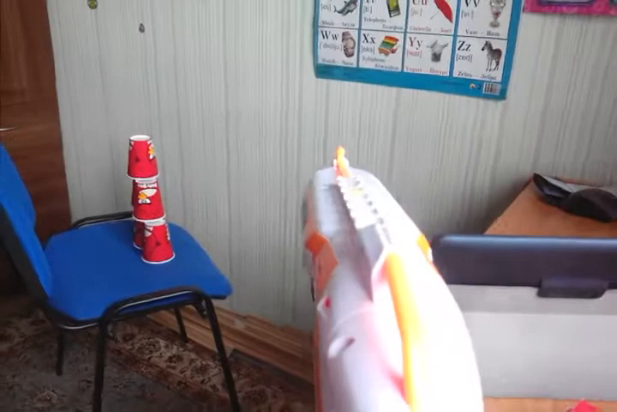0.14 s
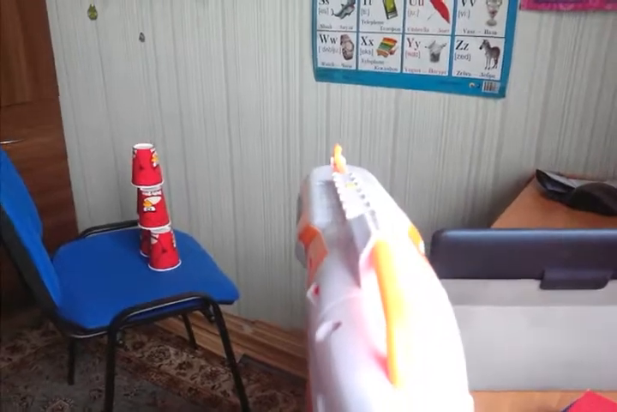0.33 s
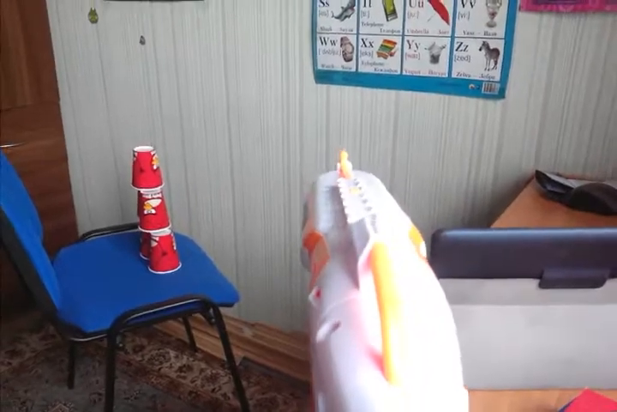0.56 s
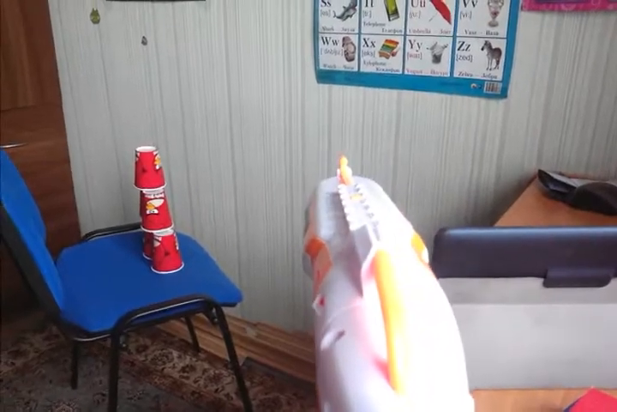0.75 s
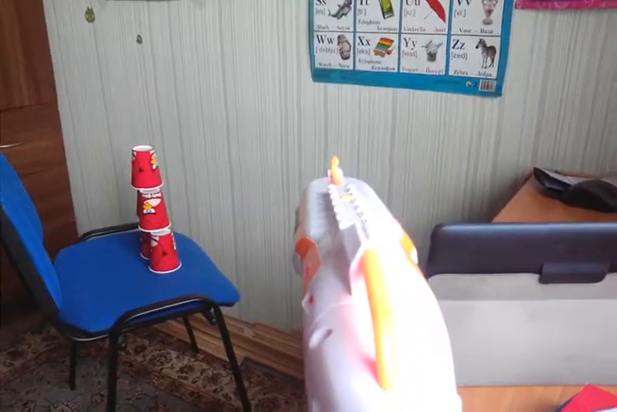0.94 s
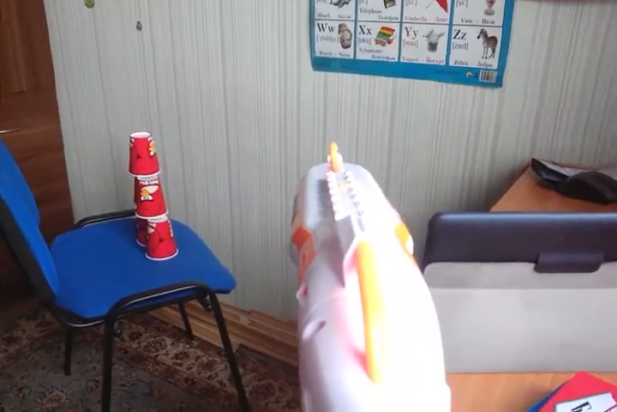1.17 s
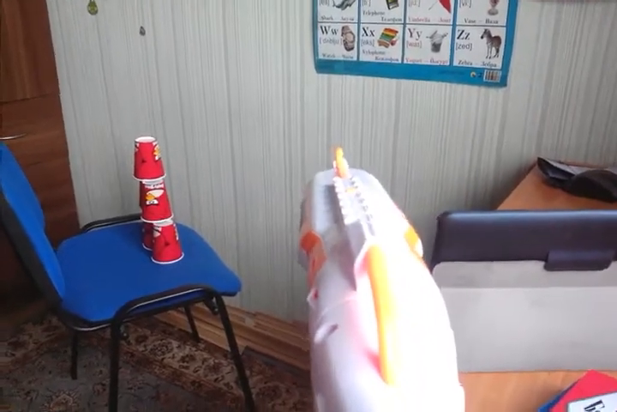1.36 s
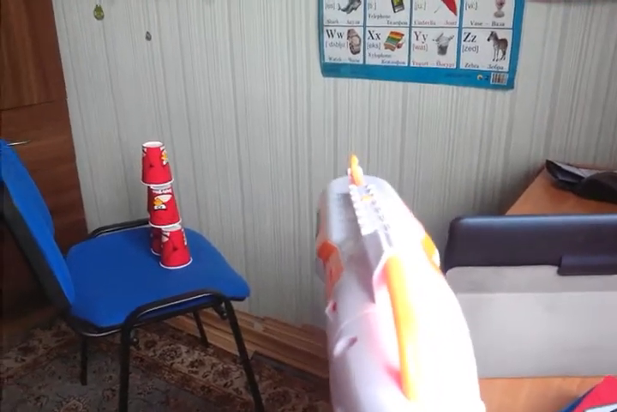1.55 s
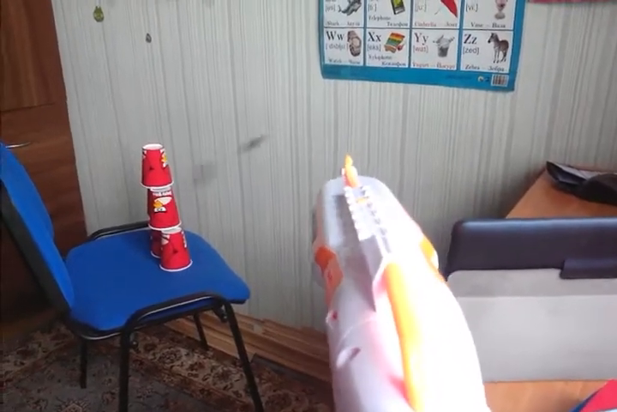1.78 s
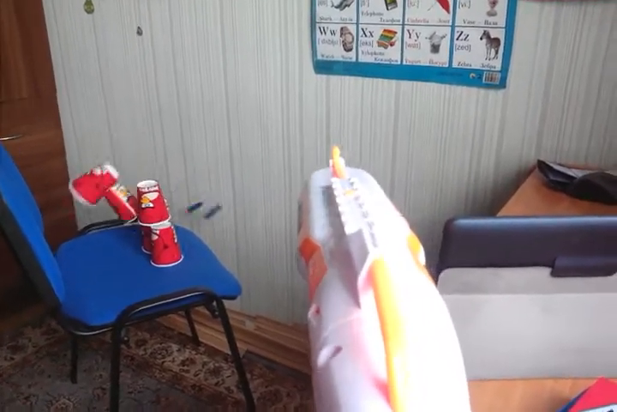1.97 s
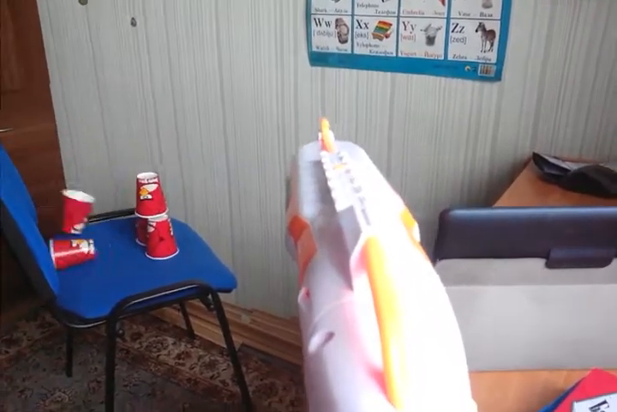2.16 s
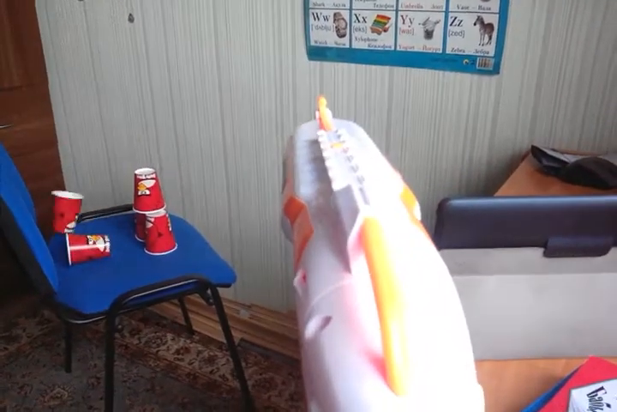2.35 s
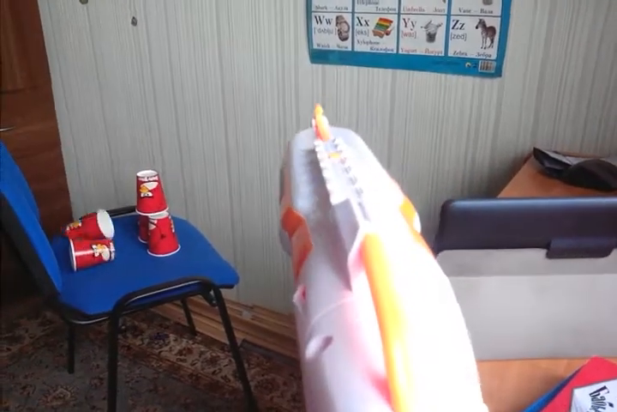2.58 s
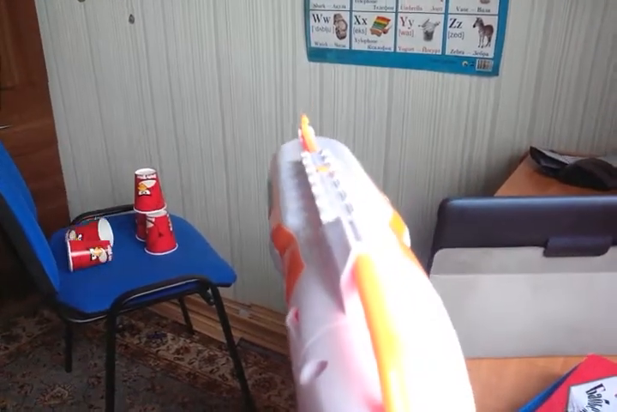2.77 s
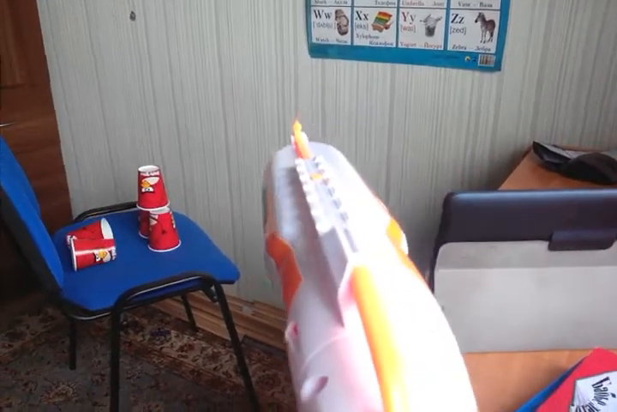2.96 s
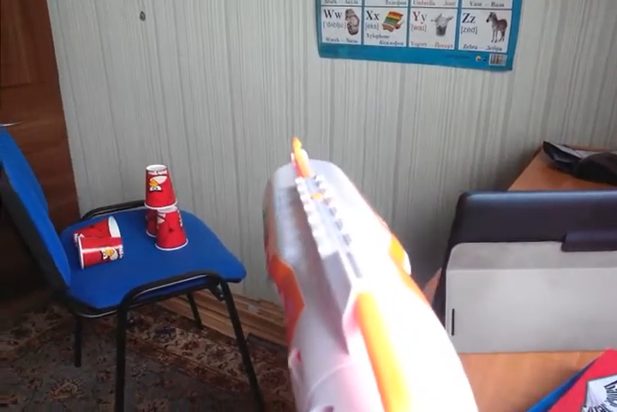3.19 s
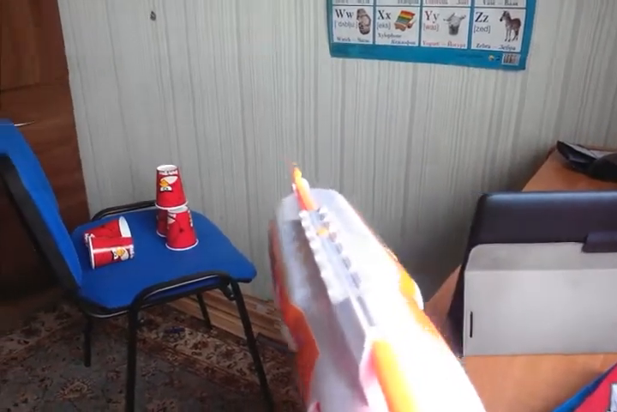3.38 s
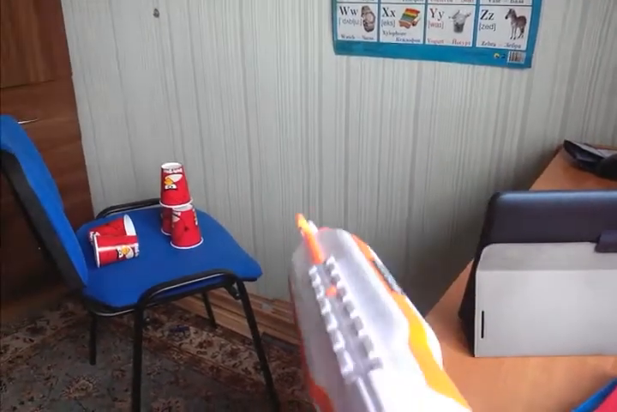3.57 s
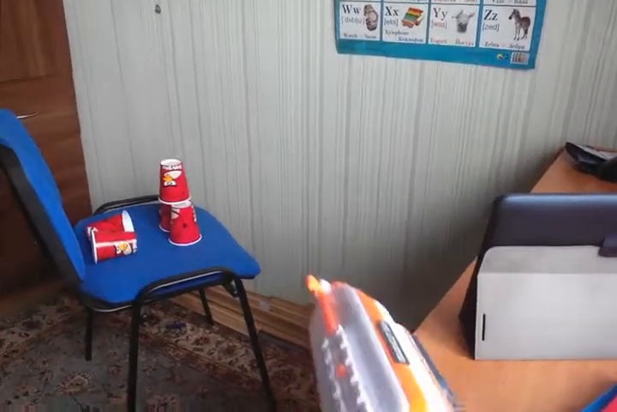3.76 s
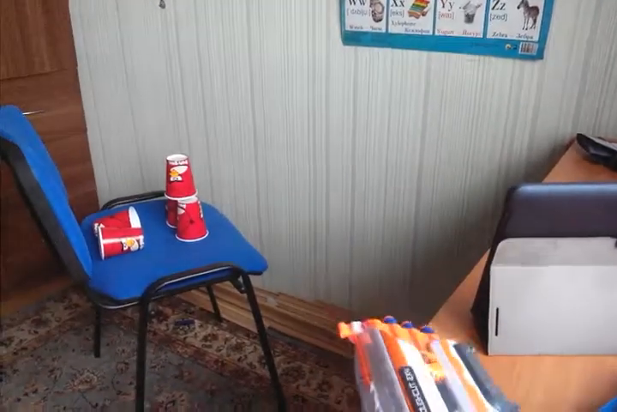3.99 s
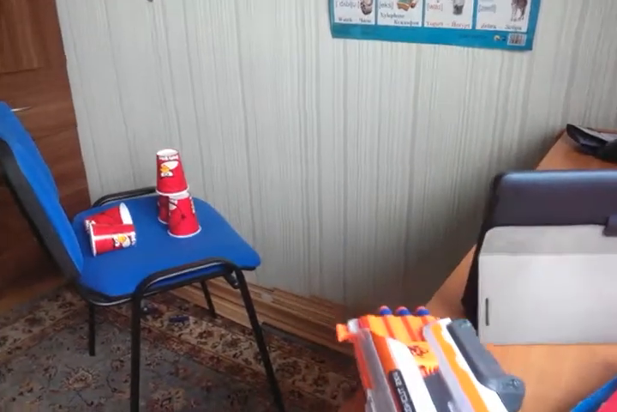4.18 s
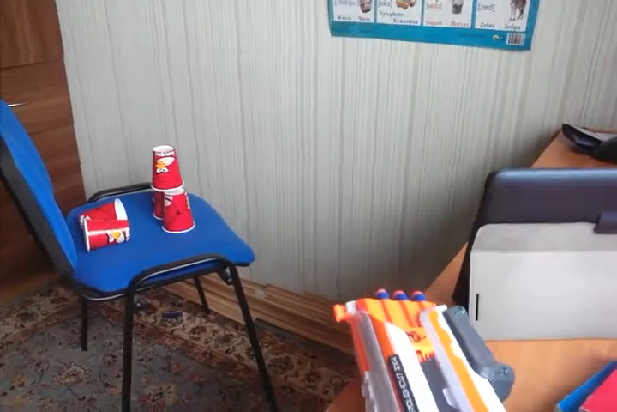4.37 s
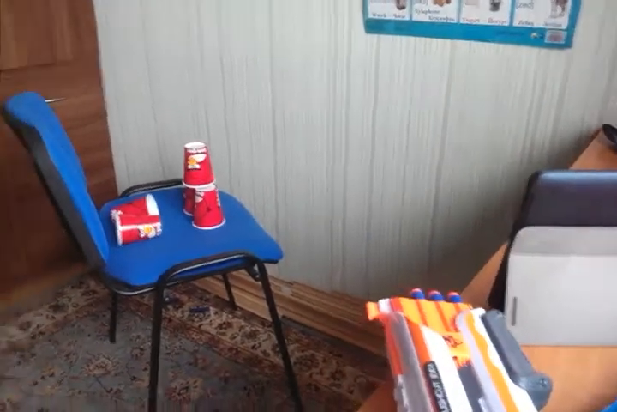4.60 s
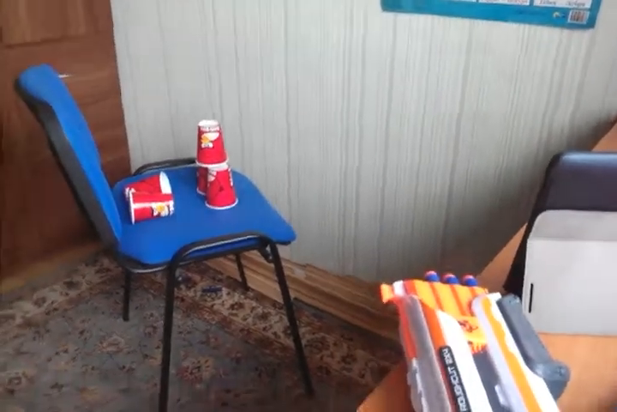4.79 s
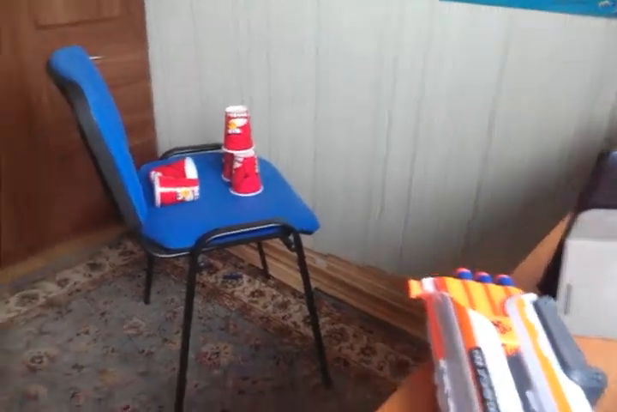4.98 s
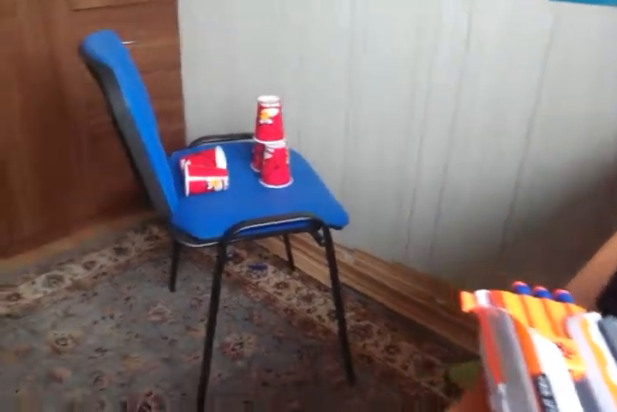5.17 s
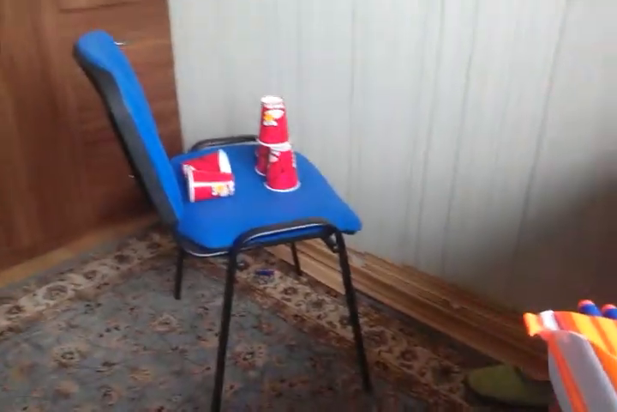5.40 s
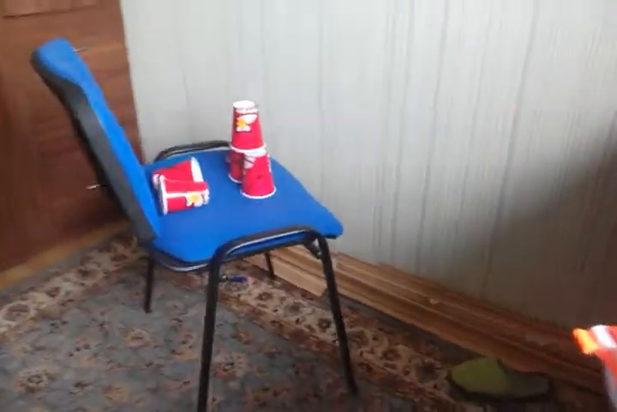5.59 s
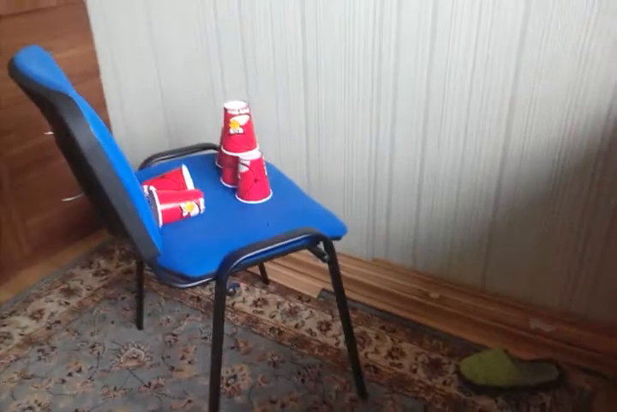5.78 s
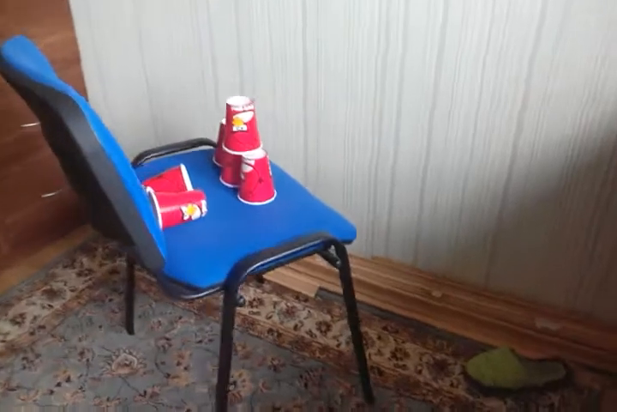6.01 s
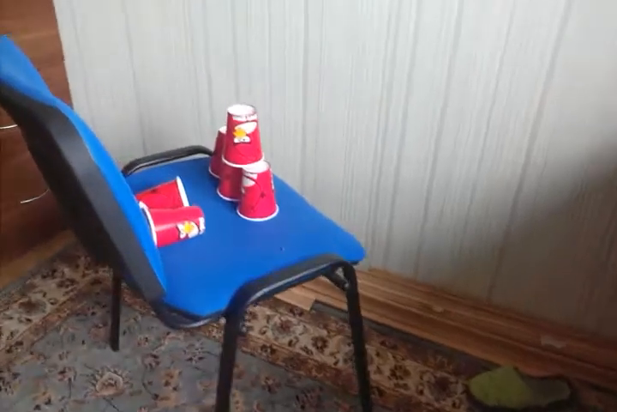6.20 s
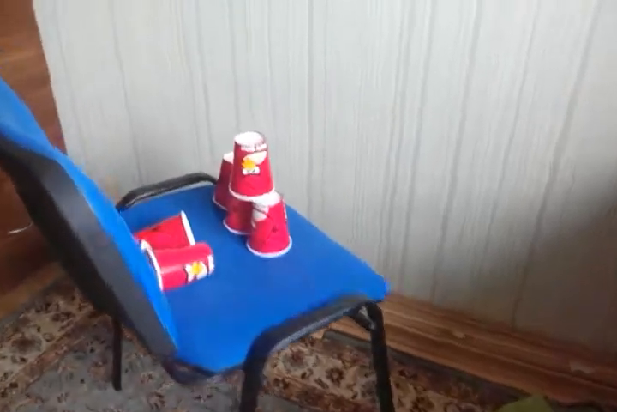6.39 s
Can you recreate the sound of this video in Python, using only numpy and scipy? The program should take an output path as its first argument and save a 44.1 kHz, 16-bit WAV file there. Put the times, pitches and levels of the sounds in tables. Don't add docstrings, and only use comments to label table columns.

```python
import sys
import numpy as np
from scipy import signal
from scipy.fft import rfft, irfft, next_fast_len
from scipy.io import wavfile
from scipy.ndimage import uniform_filter1d, map_coordinates

SR = 44100
rng = np.random.default_rng(int(sys.argv[2]) if len(sys.argv) > 2 else 0)


def makeup_ratio(level_db):
    decades = np.asarray(level_db, float) / 20
    return 10 ** decades


def pcm_store(signal):
    levels = np.round(np.clip(np.atleast_2d(signal), -1, 1) * 32767)
    wavfile.write(sys.argv[1], SR, levels.astype(np.int16).T)


N = 284291

# (time [s], peak [dB], hardness [dB/octave], local note [Hz])
SHOT_HITS = [
    (1.763, -39.5, -4.5, 2393),
    (1.8, -9.5, -3, 3630),
    (1.806, -15.5, -2, 2511),
    (1.811, -1.5, -0.8, 2230),
    (1.818, -5, 1.5, 2100),
    (1.8235, -9.5, 0.5, 2500),
    (1.829, -4, 0.3, 3000),
    (1.837, -12, -0.1, 1972),
    (1.843, -15.5, -2, 1299),
]
WALL_HITS = [
    (1.875, -20, 0.5, 1203),
    (1.885, -19, 2, 3903),
    (2.178, -38, 3, 1900),
    (2.195, -40, -2, 3920),
    (2.226, -44, 5, 3300),
]
STRIKE_HITS = [
    (1.9475, -11.5, 2.5, 3180),
    (1.9644, -25, 16, 3190),
    (2.2852, -37, 0, 3510),
]
CUP_HITS = [
    (1.95, -29, 8, 800),
    (1.971, -33, 6, 900),
    (2.398, -44.5, 1, 1215),
    (2.405, -43, 1.5, 795),
    (2.529, -54, -5, 772),
]
ROLL_HITS = [
    (2.362, -47.5, 1.5, 3270),
    (2.717, -51, -0.5, 2500),
    (2.801, -37.5, 2.5, 846),
    (3.039, -56, 1.5, 802),
    (3.399, -56, -2, 992),
]
GLANCE_HITS = [
    (2.095, -34.5, 2, 1100),
    (2.107, -36.5, 5, 910),
]
TIP_HITS = [
    (2.162, -21, 3.5, 2490),
    (2.18, -36.5, -4, 4800),
]
SEAT_HITS = [
    (2.228, -33.5, -1, 645),
    (2.237, -36.5, 5, 330),
    (2.249, -33.5, -5, 412),
    (2.269, -51.5, 10, 272),
    (2.31, -43.5, 5, 699),
    (2.49, -51.5, -8, 200),
]
SHELL_HITS = [
    (3.667, -46, -0.5, 1100),
    (3.994, -15, 1.5, 1477),
    (3.999, -14.5, -1.5, 902),
    (4.015, -36.5, -25, 910),
    (4.038, -25.5, 0, 875),
    (4.135, -36.5, -8.5, 1350),
    (4.156, -30, -6, 300),
    (4.355, -44, -3, 1110),
]
DESK_HITS = [
    (4.208, -13.5, -1.5, 362),
    (4.217, -16.5, -4.5, 206),
    (4.228, -21.5, 0.5, 365),
    (4.24, -26, -13, 500),
    (4.285, -41, -1, 328),
    (4.823, -45, -7, 223),
]
GRIP_HITS = [
    (4.735, -34.5, 1, 5200),
    (4.747, -17, -3.5, 1540),
    (4.759, -26, -3, 1430),
    (4.774, -29, -8.5, 1650),
    (4.794, -31.5, -6, 1440),
    (4.819, -51, -9, 1423),
    (5.929, -45, -1.5, 910),
    (5.945, -45, -3, 586),
    (5.964, -59, -2, 968),
]
ROCK_HITS = [
    (4.5385, -36, -1, 2800),
    (4.545, -33.5, -2.5, 397),
    (4.593, -36.5, -6, 1490),
    (4.609, -49, 0, 2050),
]
CREAK_HITS = [
    (4.404, -46, -7.5, 2300),
    (4.413, -54, 13, 7000),
    (4.429, -45.5, 1, 2470),
    (4.458, -47.5, 4, 2330),
    (4.506, -54, 1, 2250),
]
# (first peak [dB], loss per contact [dB], hardness [dB/octave], note [Hz])
WALL_RATTLE = (-14.5, 2.2, 0, 1200.5)
RIM_ROCKING = (-50, 1.5, 2, 590)
# (first time [s], spacing [s])
WALL_BEAT = (1.858, .0128)
RIM_BEAT = (2.829, .04)

# (frequency [Hz], width [Hz], level [dB])
BLASTER_BODY = ([(47, -53.5), (100, -22), (200, 0.5), (293, -13.5), (405, -6), (441, -7), (1300, -3),
                 (1840, -3.5), (1960, -1.5), (5180, -15.5), (7320, -11), (14000, -23)], [(2100, 270, -8),
                 (3140, 410, 1), (3630, 110, -5.5), (7300, 170, -4.5), (7858, 35, -5.5), (8200, 41, -8),
                 (8900, 25, -12.5), (8750, 42, -12.5), (10200, 290, -15), (12000, 32, -23.5)])
WALL_BODY = ([(59, -47), (100, -5), (877, -5.5), (952, -6), (1200, -6), (2570, -10), (3970, -10.5),
              (10700, -23), (14000, -32)], [(1122.5, 120, -1), (4084, 63, -1), (6155, 30, -22)])
PAPER_BODY = ([(88, -52.5), (150, -48), (443, -1), (588, -14), (753, -3), (844, -14), (1120, -15),
               (1940, -33), (3190, -18.5), (12000, -35), (14000, -43.5)], [(763, 110, -13.5),
               (924, 60, -15), (1080, 35, -14.5)])
RIM_BODY = ([(120, -64), (200, -12.5), (667, -18.5), (809, -11), (1050, -22.5), (3330, -26.5),
             (13000, -43)], [(780, 60, -9.5), (2690, 36, -28), (3270, 90, -12)])
FOAM_BODY = ([(88, -57), (150, -20), (427, -4.5), (604, -13), (888, -11), (1010, -11.5), (12000, -46),
              (15600, -65), (22000, -120)], [(910, 44, -10), (4000, 62, -14)])
TIP_BODY = ([(120, -47), (200, -10), (815, 3), (1180, 8), (1720, -27), (2450, -7), (2780, -21.5),
             (14000, -33)], [(1180, 10, -12), (2490, 40, -2), (3000, 34, -7), (3630, 32, -4.5),
             (4000, 18, -4), (6930, 39, -9.5), (8360, 120, -9.5)])
PAD_BODY = ([(18, -48), (30, -5), (329, -9), (639, -14), (853, -16), (1590, -31), (3150, -29), (6000, -47),
             (7800, -58), (13200, -120)], [(155.4, 9.6, 5), (300, 76, -6.5), (755, 60, -11)])
SHELL_BODY = ([(35, -43), (60, -18.5), (175, -11.5), (310, -15.5), (501, -15.5), (689, -14), (927, 4.5),
               (1060, -4), (4080, -16.5), (14000, -36)], [(491, 30, 10.5), (916, 82.1, -24),
               (1740, 21.4, -6), (2030, 32, -8), (2230, 110, 10.5), (2903, 86, 4.5), (3510, 60, 3),
               (5070, 31, -30)])
DESK_BODY = ([(18, -74.5), (30, -56), (93, -18.5), (363, -5), (435, -12.5), (1020, -19.5), (1190, -15.5),
              (1980, -31.5), (7360, -30), (14000, -39.5)], [(222, 32, 0), (354, 40, -9), (860, 22, -17),
              (1090, 55, -6.5), (2136, 120, -9.5), (3170, 61, -14)])
GRIP_BODY = ([(47, -53.5), (80, -49), (174, -1), (286, -11.5), (405, -4.5), (665, -11.5), (710, -7),
              (1420, -4.5), (14000, -36.5)], [(1050, 110, 3), (1440, 100, -2), (1697, 33, -11),
              (2145, 90, 2), (2692, 270, 7.5), (3510, 48, -24.5)])
STOCK_BODY = ([(47, -55), (80, -17), (209, -6.5), (293, -11.5), (355, -4), (556, -11.5), (1420, -8.5),
               (13000, -26.5)], [(383, 42, -16), (3000, 530, -5)])
CATCH_BODY = ([(300, -30), (1500, 1), (2400, -8), (4000, -11), (13000, -29)], [(2350, 210, 0.0039)])

# (time [s], peak [dB], pitch [Hz], t60 [s])
BARE_SNAPS = [(1.8015, -10, 3600, 0.0074), (1.8111, -7, 2220, 0.0048), (1.8193, -11, 2900, .003),
              (1.84, -17, 2300, .006), (1.813, -7, 2570, 0.0029), (1.83, -4, 2600, 0.0029),
              (1.8586, -21, 4200, .005), (1.866, -13, 4420, .004), (1.8704, -19, 3500, .004),
              (1.881, -12, 4000, 0.0043), (1.8859, -12, 4000, 0.0043), (1.9497, -19, 3140, 0.0045),
              (1.9661, -19, 3180, 0.0061), (2.0947, -36, 2100, 0.022), (2.8015, -43, 3000, 0.0026),
              (2.804, -50, 5400, .008), (3.9923, -50, 1490, .006), (4.157, -41, 5540, 0.0025),
              (4.181, -55, 4500, .003), (4.7364, -35.5, 5330, 0.0052), (4.7476, -20, 1650, 0.004),
              (4.751, -25.5, 2620, .008), (4.796, -36, 2500, .004), (4.786, -49, 6500, .004),
              (2.2854, -40, 3000, .005), (4.039, -32, 2500, .005), (4.0395, -29, 950, .012),
              (4.404, -57, 2320, .008), (4.534, -52, 2200, .008), (4.5445, -40, 3200, .008),
              (4.553, -44, 1600, .01), (4.595, -45, 2200, .005), (5.1716, -57.5, 4240, .005),
              (5.2078, -56.5, 2500, .006), (5.2909, -54, 5040, 0.0032), (5.7176, -54, 4120, .005)]
# (top time [s], peak [dB], half length [s], pitch [Hz])
SOFT_NOTES = [(1.951, -31, 0.0071, 795), (1.963, -28, 0.0031, 860), (1.978, -23, 0.0098, 745),
              (2.0, -32.5, 0.0046, 755), (2.021, -34, 0.0085, 735), (2.036, -42, .003, 700),
              (2.052, -52, 0.0065, 745), (2.108, -44, 0.0074, 888), (2.173, -43.5, 0.0098, 1185),
              (2.19, -49, 0.0087, 1090), (2.367, -54.5, 0.0054, 3270), (2.813, -45, 0.0063, 795),
              (2.835, -54, .005, 850), (2.853, -60, 0.0065, 780), (2.881, -54, 0.014, 782),
              (2.91, -59.5, .008, 805), (2.932, -59, .005, 790), (2.953, -63, 0.0074, 808),
              (3.045, -64, 0.012, 806), (2.838, -62, 0.0092, 3240), (2.9, -73, .03, 3190),
              (4.018, -46, 0.0093, 894), (4.14, -41, 0.0087, 765), (4.153, -38.5, 0.0043, 840),
              (3.672, -51.5, 0.0028, 1050), (3.677, -61.5, 0.0086, 2920), (4.506, -56, 0.0033, 2250),
              (4.115, -49, .007, 736), (4.286, -39, 0.0044, 350), (4.739, -47, .003, 1050),
              (4.738, -48, .003, 2700), (4.79, -42, .005, 1680), (4.814, -44, .005, 1480)]
# (time
# [s], level [dB], half length [s], note [Hz])
GRAINY_SWELLS = [(4.556, -55, 0.026, 630), (4.55, -55, .02, 2030), (4.605, -57, .02, 1370),
                 (4.24, -45.5, 0.035, 840), (4.145, -50, 0.033, 1840), (4.64, -71, 0.26, 2100),
                 (4.899, -68.5, 0.091, 2000), (4.108, -57, .025, 1360), (4.15, -47, .012, 1270),
                 (4.165, -52.5, 0.029, 3040), (3.8, -48.5, 0.027, 265), (4.235, -45.5, 0.028, 1950),
                 (4.23, -51.5, 0.034, 3800), (4.275, -53, .02, 1030), (4.32, -58, .025, 1200),
                 (4.76, -41.5, 0.024, 1370), (4.81, -51, 0.017, 1470), (4.4, -64, 0.026, 1400),
                 (4.8, -59, .02, 3000), (4.83, -54, 0.065, 170), (4.142, -48, 0.013, 1370),
                 (3.8, -63, .05, 2560), (4.375, -62, .015, 1900),
                 (1.85, -48, .1, 140), (1.845, -38, .04, 11000), (1.897, -34, 0.035, 1190),
              (2.103, -52, 0.022, 1500), (2.2, -55, .03, 3700), (2.245, -51, .02, 153),
              (2.25, -51, 0.032, 620), (1.96, -37, .025, 3200), (1.82, -26.5, .03, 1400),
              (3.675, -65, .015, 1500), (3.2, -66, .015, 3200), (1.936, -41, 0.014, 1200),
              (1.963, -38, 0.019, 1020), (2.9, -66, 0.029, 5000), (2.812, -62.5, 0.023, 3300),
              (2.87, -68, .02, 4300), (2.87, -66, 0.019, 1100)]
# (time [s], level [dB], half length [s], swish over cloth [dB])
CLOTH_RUBS = [
    (4.422, -62.5, 0.053, -5),
    (4.977, -67, .03, -7),
    (5.006, -62, 0.02, -5.5),
    (5.218, -70, 0.048, 6),
    (5.293, -72, 0.044, 0),
    (5.452, -71.5, 0.18, -8.5),
    (5.594, -71.5, 0.037, 5),
    (5.708, -76, 0.052, 7.5),
    (5.925, -72.5, 0.19, -7),
    (6.447, -67.5, 0.14, -9.5),
]
# (time [s], level [dB], half length [s])
SLIPPER_DRAGS = [
    (4.33, -62.5, 0.034),
    (4.43, -58.5, 0.049),
    (4.998, -67, 0.052),
    (5.222, -66.5, 0.17),
    (5.47, -71, 0.19),
    (5.69, -67, 0.14),
    (5.92, -69, .15),
    (6.18, -69, 0.035),
    (6.447, -70.5, .1),
]
# (time [s], level [dB], half length [s])
FLOOR_THUMPS = [
    (1.84, -60, 0.12),
    (2.26, -63.5, 0.19),
    (2.77, -78.5, 0.26),
    (4.0, -70, 0.064),
    (4.24, -58, 0.082),
    (4.82, -53, 0.044),
    (5.96, -87, 0.039),
    (6.2, -81, 0.32),
]
# (frequency [Hz], density [dB/Hz])
CLOTH_SPECTRUM = [(590, -28), (1000, -4.5), (1620, -6.5), (2580, 0.5), (5000, -16), (6500, -50),
                  (11000, -120)]
SWISH_SPECTRUM = [(2400, -15), (4000, -8), (9000, -14.5), (14000, -22)]
SHUFFLE_SPECTRUM = [(47, -61), (80, -5), (118, -2), (510, -2), (1500, -14.5), (1950, -29), (3300, -120)]
FLOOR_SPECTRUM = [(15, -39.5), (25, -12), (43, -8), (107, 0), (130, 4.5), (170, -30.5), (290, -120)]
HISS_SPECTRUM = [(15, -58.5), (25, -24.5), (74, -17), (129, -4.5), (214, -3), (686, -6.5), (826, -4.5),
                 (1200, -9), (1600, -10.5), (1740, -11), (2450, -9.5), (2720, -12), (8970, -15.5),
                 (14100, -15.5)]
# (frequency [Hz], t60 [s])
ROOM_T60 = [(100, 0.38), (1000, 0.25), (4000, 0.21), (12000, 0.2)]
# (start [s], end [s], pitch [Hz], partial 1 [dB], partial 2 [dB], partial 3 [dB])
MOTOR_TONES = [
    (-.2, 1.74, 811, -81.5, -85, -89.5),
    (2.36, 3.51, 946, -76, -100, -100),
    (3.3, 4.05, 822, -84.5, -90, -86),
    (5.2, 5.8, 2580, -81, -100, -100),
]
# (time [s], level [dB])
HISS_GAIN = [(0, 2.5), (1.7, 1.6), (2.5, 0.5), (3.35, 0.3), (3.9, 1.3), (5, 1), (6.45, 0.5)]


def along(points, hz):
    f, v = np.transpose(points)
    return np.interp(np.log(hz + 1), np.log(f + 1), v)


def unit(x):
    return x / np.sqrt(np.mean(x ** 2) + 1e-20)


def wobble(rate_hz):
    knots = rng.standard_normal(int(N * rate_hz / SR) + 4)
    return map_coordinates(knots, [np.arange(N) * rate_hz / SR])


def grains(uneven_db, rate_hz):
    return rng.standard_normal(N) * makeup_ratio(uneven_db * wobble(rate_hz))


def coloured(x, spectrum):
    size = next_fast_len(N + 8192)
    gain = makeup_ratio(along(spectrum, np.fft.rfftfreq(size, 1 / SR)))
    return unit(irfft(rfft(x, size) * gain, size)[:N])


def swells(rows, quick):
    t = np.arange(0, N / SR, .001)
    gain = sum(makeup_ratio(db - 10 * np.maximum(quick * (s - t), t - s) / half_s) for s, db, half_s in rows)
    return np.interp(np.arange(N) / SR, t, gain)


def repeats(beat, strength, count):
    first_s, spacing_s = beat
    db, loss_db, *tone = strength
    return [(first_s + k * spacing_s, db - k * loss_db, *tone) for k in range(count)]


def causal(gain):
    cepstrum = irfft(np.log(gain + 1e-6))
    half = len(cepstrum) // 2
    cepstrum[1:half] *= 2
    cepstrum[half + 1:] = 0
    return np.exp(rfft(cepstrum))


def resonance(hz, centre_hz, width_hz):
    width = (hz * width_hz) ** 2
    return width / ((centre_hz ** 2 - hz * hz) ** 2 + width + 1)


def room(x):
    hz, t, z = signal.stft(rng.standard_normal(len(x)), SR, nperseg=256)
    decay = makeup_ratio(-60 * t / along(ROOM_T60, hz)[:, None])
    tail = signal.istft(z * decay, SR, nperseg=256)[1]
    tail = np.pad(tail, (round(.006 * SR), 0))
    return signal.fftconvolve(x, tail / np.linalg.norm(tail))[:len(x)]


def knocks(contacts, body, ring_db, room_db, t60_s, note_db, spread=0.024):
    size = 12288
    out = np.zeros(N + size)
    t, hz = np.arange(size) / SR, np.fft.rfftfreq(size, 1 / SR)
    broad, modes = body
    broad = makeup_ratio(along(broad, hz))
    for s, db, hardness_db, note_hz in contacts:
        ring = np.zeros(len(hz))
        for centre_hz, width_hz, mode_db in modes:
            a, b = rng.standard_normal(2)
            mode = resonance(hz, centre_hz * (1 + 0.0075 * b), width_hz + spread * centre_hz)
            ring += makeup_ratio(2 * (mode_db + 2.2 * a)) * mode
        colour = broad + makeup_ratio(ring_db) * np.sqrt(ring)
        note = note_db * resonance(hz, note_hz, .4 * note_hz)
        colour *= makeup_ratio(hardness_db * np.log2((hz + 400) / 1500) + note)
        crackle_db = np.repeat(2.5 * rng.standard_normal(size // 32), 32)
        force = rng.standard_normal(size) * makeup_ratio(crackle_db - 60 * t / t60_s)
        force *= 1 - np.exp(-t / (0.037 * t60_s))
        hit = irfft(rfft(force) * causal(colour))
        early = np.linalg.norm(hit[:round(.008 * SR)])
        hit *= makeup_ratio(db - 8) * np.sqrt(0.0029 * SR) / early
        out[round(s * SR):][:size] += hit + makeup_ratio(room_db) * room(hit)
    return out[:N]


def blaster_shot():
    return knocks(SHOT_HITS, BLASTER_BODY, ring_db=-5.5, room_db=-11, t60_s=.036, note_db=4.5)


def laying_down():
    out = knocks(SHELL_HITS, SHELL_BODY, ring_db=-9.5, room_db=-7.5, t60_s=.021, note_db=1)
    out += knocks(DESK_HITS, DESK_BODY, ring_db=-9, room_db=-7, t60_s=.022, note_db=6.5, spread=.04)
    return out + knocks(GRIP_HITS, GRIP_BODY, ring_db=-14, room_db=-7.5, t60_s=.048, note_db=9, spread=.029)


def cups_struck():
    out = knocks(CUP_HITS, PAPER_BODY, ring_db=9, room_db=-14, t60_s=.025, note_db=5, spread=.035)
    return out + knocks(STRIKE_HITS, PAPER_BODY, ring_db=9.5, room_db=-3.5, t60_s=.021, note_db=8.5, spread=.025)


def dart_drop():
    return knocks(TIP_HITS, TIP_BODY, ring_db=8.5, room_db=-8, t60_s=.025, note_db=5, spread=.028)


def rocking_back():
    return knocks(ROCK_HITS, STOCK_BODY, ring_db=-8, room_db=-4, t60_s=.043, note_db=3.5)


def seat_drops():
    out = knocks(SEAT_HITS, PAD_BODY, ring_db=-4, room_db=-3, t60_s=.054, note_db=3, spread=.054)
    return out + knocks(GLANCE_HITS, FOAM_BODY, ring_db=-16, room_db=-1.5, t60_s=.032, note_db=9, spread=.081)


def cups_rolling():
    contacts = ROLL_HITS + repeats(RIM_BEAT, RIM_ROCKING, count=4)
    return knocks(contacts, RIM_BODY, ring_db=-3.5, room_db=-1, t60_s=.04, note_db=2.5, spread=.014)


def slaps_and_rattle():
    contacts = WALL_HITS + repeats(WALL_BEAT, WALL_RATTLE, count=6)
    return knocks(contacts, WALL_BODY, ring_db=-7.5, room_db=-2.5, t60_s=.035, note_db=5.5, spread=.14)


def hoots():
    out, t = np.zeros(N), np.arange(-.06, .12, 1 / SR)
    for s, db, half_s, hz in SOFT_NOTES:
        tone = np.sin(2 * np.pi * (hz * t + rng.random()))
        out[round((s + t[0]) * SR):][:len(t)] += makeup_ratio(db) * np.exp(-(t / half_s) ** 2) * tone
    return out


def snaps():
    out, t = np.zeros(N), np.arange(1024) / SR
    for s, db, hz, t60_s in BARE_SNAPS:
        puff = uniform_filter1d(rng.standard_normal(len(t)), size=3)
        swell = makeup_ratio(db - 60 * t / t60_s) * (1 - np.exp(-t * hz * 2.5))
        out[round(s * SR):][:len(t)] += swell * (np.sin(2 * np.pi * hz * t) + 0.29 * puff)
    return out


def scrape():
    size = 32768
    lead = size // 4
    friction = np.pad(grains(2.3, 350), (0, size))
    out, hz = np.zeros(N + size), np.fft.rfftfreq(size, 1 / SR)
    t = (np.arange(size) - lead) / SR
    for s, db, half_s, note_hz in GRAINY_SWELLS:
        ring = (1j * hz * note_hz / (note_hz ** 2 - hz * hz + .4j * hz * note_hz)) ** 2
        at = round(s * SR) - lead
        swell = makeup_ratio(db - 10 * np.maximum(-2.4 * t, t) / half_s)
        out[at:at + size] += swell * unit(irfft(rfft(friction[at:at + size]) * ring))
    return out[:N]


def creaks():
    return knocks(CREAK_HITS, CATCH_BODY, ring_db=-2, room_db=-28, t60_s=.042, note_db=9)


def rustle():
    rubs = [(s, db, half_s) for s, db, half_s, _ in CLOTH_RUBS]
    swishes = [(s, db + over_db, 0.73 * half_s) for s, db, half_s, over_db in CLOTH_RUBS]
    out = swells(rubs, quick=0.89) * coloured(grains(1.8, 280), CLOTH_SPECTRUM)
    out += swells(SLIPPER_DRAGS, quick=2.5) * coloured(grains(1.9, 60), SHUFFLE_SPECTRUM)
    out += swells(FLOOR_THUMPS, quick=2.5) * coloured(rng.standard_normal(N), FLOOR_SPECTRUM)
    return out + swells(swishes, quick=1.4) * coloured(grains(2.8, 580), SWISH_SPECTRUM)


def whine():
    t, out = np.arange(N) / SR, np.zeros(N)
    for start_s, end_s, hz, *levels_db in MOTOR_TONES:
        fade = np.clip(np.minimum(t - start_s, end_s - t) / .15, 0, 1)
        phase = 2 * np.pi * np.cumsum(hz * (1 + 0.0012 * wobble(3.0))) / SR
        sway_db = 3 + 1.8 * wobble(14)
        for k, db in enumerate(levels_db, 1):
            out += fade * makeup_ratio(db + sway_db) * np.sin(k * phase)
    return out


def hiss():
    s, db = np.transpose(HISS_GAIN)
    gain = uniform_filter1d(makeup_ratio(np.interp(np.arange(N) / SR, s, db, left=-120, right=-120)), size=441)
    return makeup_ratio(-68 + 0.39 * wobble(3.3)) * gain * coloured(rng.standard_normal(N), HISS_SPECTRUM)


def scene():
    objects = blaster_shot() + laying_down() + cups_struck() + dart_drop() + rocking_back() + seat_drops()
    objects += cups_rolling() + slaps_and_rattle()
    objects += hoots() + snaps() + scrape() + creaks()
    hz = np.fft.rfftfreq(N, 1 / SR)
    thin = (1j * hz / (90 + 1j * hz)) ** 2
    dull = makeup_ratio(-7 * (hz / 13500) ** 6)
    heard = irfft(rfft(objects) * thin * dull, N)
    return (heard + rustle() + whine() + hiss())[None]


def low_pass(x):
    return signal.sosfilt(signal.butter(12, 14230, fs=SR, output="sos"), x)


def record(dry):
    rounded = dry / (1 + np.abs(dry / .7) ** 4) ** (1 / 4)
    hz, top_hz = np.fft.rfftfreq(N, 1 / SR), 13900
    limited = irfft(rfft(rounded) * np.clip((top_hz + 100 - hz) / 200, 0, 1), N)
    return low_pass(limited)


dry = scene()
out = record(dry)
pcm_store(out)
```